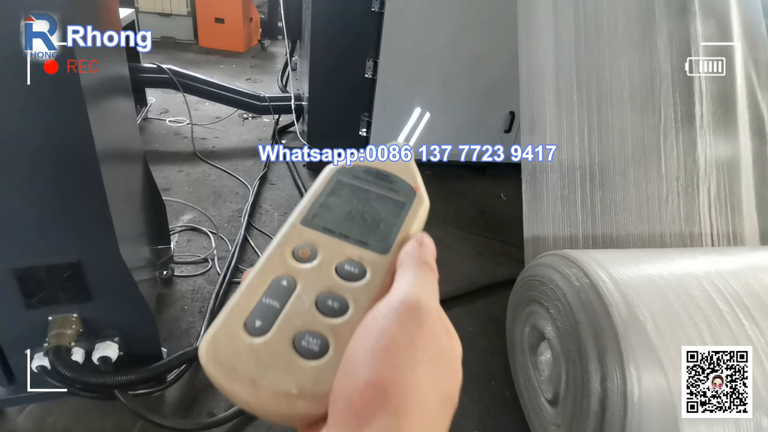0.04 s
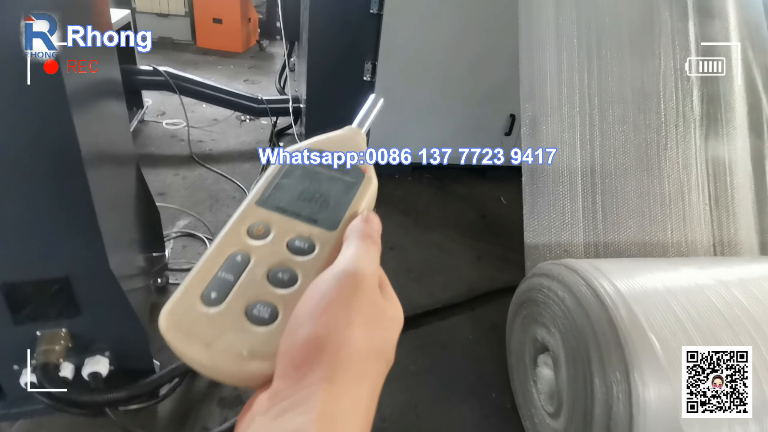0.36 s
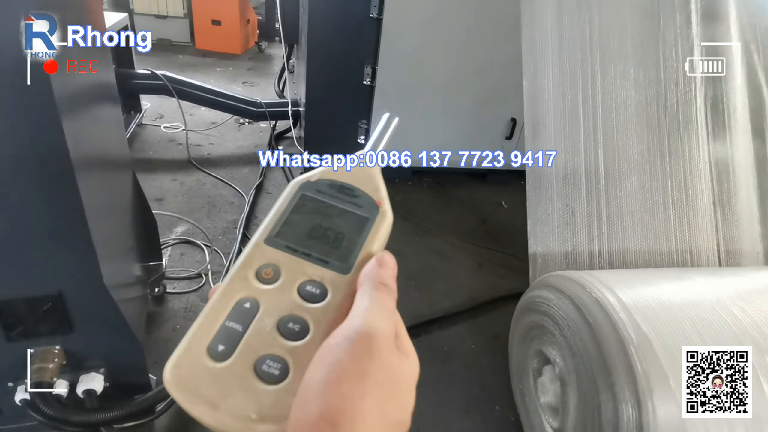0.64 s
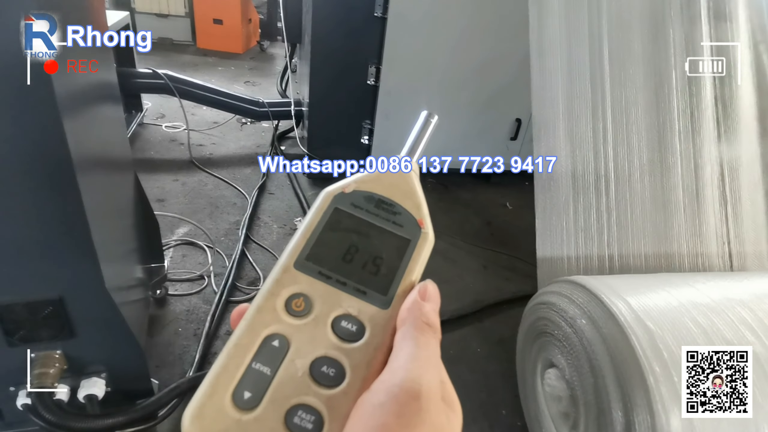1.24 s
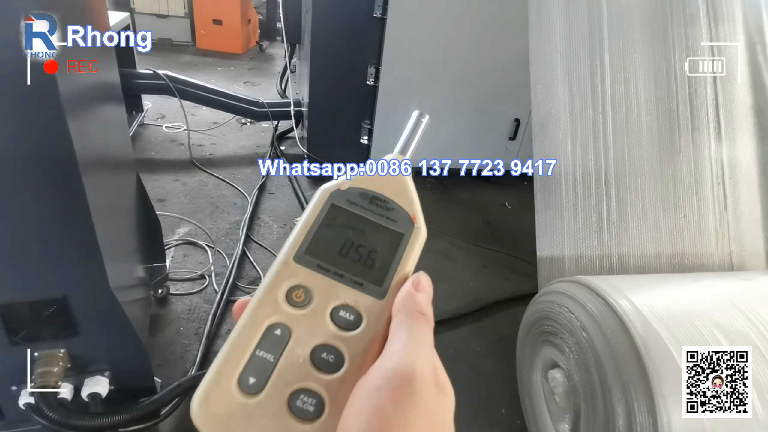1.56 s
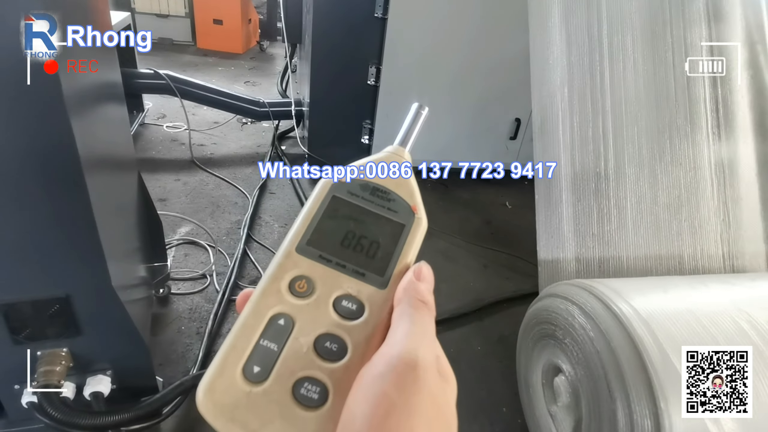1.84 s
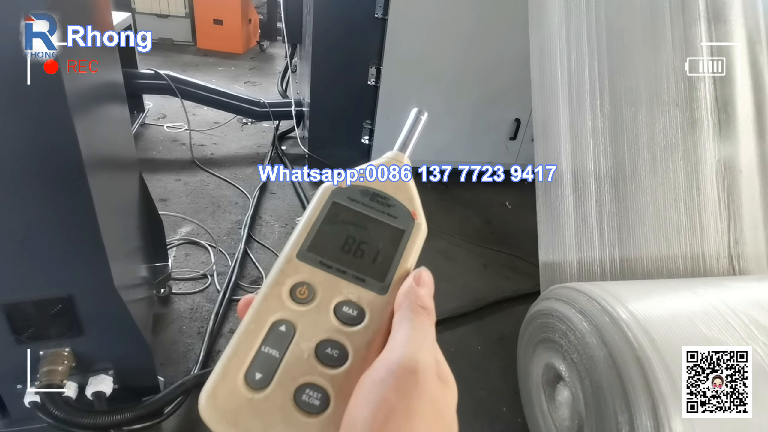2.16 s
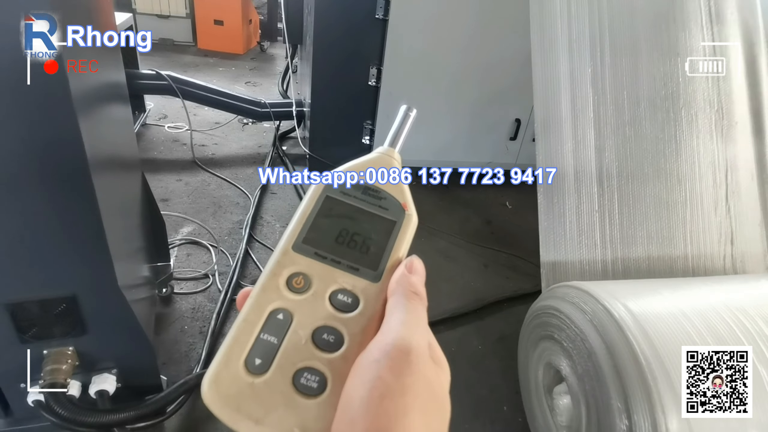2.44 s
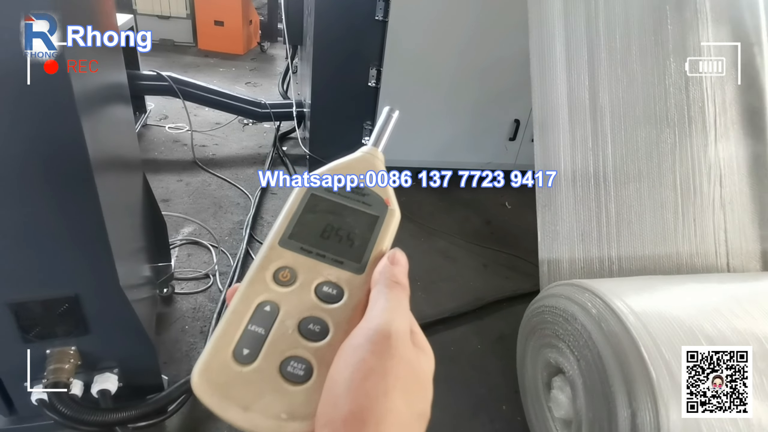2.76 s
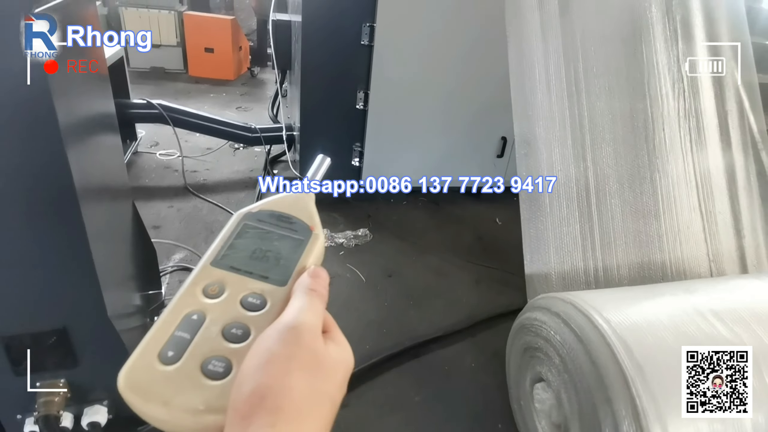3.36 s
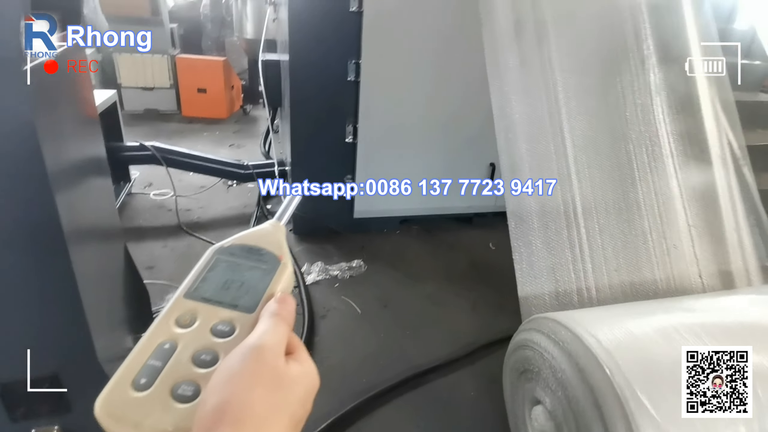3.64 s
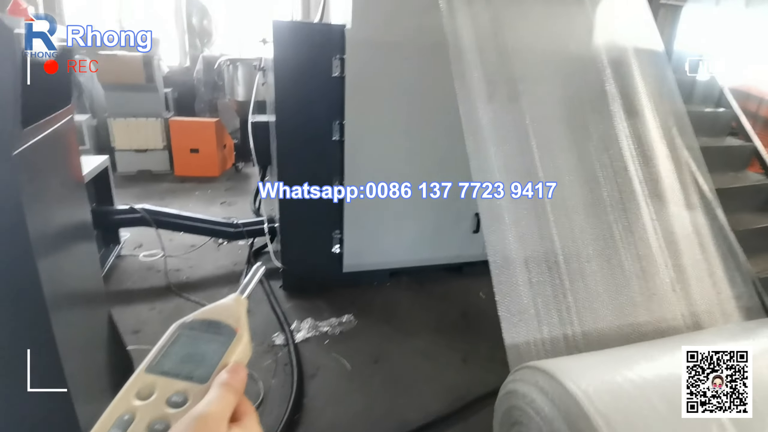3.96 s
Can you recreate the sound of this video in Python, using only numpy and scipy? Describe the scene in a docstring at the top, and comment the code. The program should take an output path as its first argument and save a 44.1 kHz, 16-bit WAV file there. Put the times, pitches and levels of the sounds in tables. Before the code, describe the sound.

A plastic grinding machine runs close by in a workshop for four seconds, with a swelling motor hum, steady whirr and faint hiss on the right. From 0.2 seconds it booms and rumbles in surges about twice a second, with plastic grinding just after. Lumps thud against the panels and plastic squeaks faintly on steel throughout. Near 2.5 and 2.7 seconds a panel gives two short, low growls.

```python
"""A plastic granulator runs in a workshop, heard from close by.
From the start a motor hums in swells over a steady whirr and a hiss from the right. At 0.2 s, and then
about twice a second, the rotor takes a load: knife strokes force the housing to boom on multiples of
the cutting rate, and a little later the plastic grinds. Along the way lumps thud against the panels and
plastic squeaks on steel. Near 2.5 s and 2.7 s the tumbling load draws two short growls from a panel."""
import sys
import numpy as np
from scipy.fft import rfft, irfft, next_fast_len
from scipy.io import wavfile
from scipy.ndimage import map_coordinates

SR = 44100
rng = np.random.default_rng(int(sys.argv[2]) if len(sys.argv) > 2 else 0)


def wav_out(sig):
    """Save sig, one row per channel (or a flat mono array), as 16-bit PCM at SR to the path in sys.argv[1]."""
    wavfile.write(sys.argv[1], SR, np.round(np.clip(np.atleast_2d(sig).T, -1, 1) * 32767).astype(np.int16))


N = 176400
TIME_S = np.arange(N) / SR
OPPOSED = np.array([[1], [-1]])  # plus on the left, minus on the right


# Load on the rotor: time_s, load_db
ROTOR_LOAD = [(0.0, -29), (0.17, -28), (0.2, -13), (0.26, -10.5), (0.46, -18), (0.49, -42), (0.75, -37),
              (0.85, -12.5), (0.99, -15.5), (1.06, -11), (1.22, -26.5), (1.3, -28.5), (1.4, -11),
              (1.47, -17.5), (1.49, -10.5), (1.68, -24), (1.83, -31.5), (1.96, -10.5), (2.07, -12.5),
              (2.1, -18), (2.16, -15.5), (2.26, -29), (2.39, -28), (2.44, -18), (2.56, -20), (2.67, -29),
              (2.73, -21.5), (2.81, -28), (2.97, -13), (3.07, -15), (3.13, -30), (3.17, -26), (3.2, -37),
              (3.36, -28), (3.41, -13.5), (3.46, -10.5), (3.6, -12.5), (3.77, -30.5), (3.87, -28),
              (4.0, -14.5)]
# Harmonics of the cutting rate in the housing: harmonic_number, relative_level_db
HOUSING_HARMONICS = [(2, -25), (3, -18), (4, -4), (5, 1), (6, -23.5), (7, -10), (8, -19.5), (9, -19),
                     (10, -35.5), (11, -34), (12, -30.5), (14, -28), (16, -30.5), (17, -27.5)]
# Spectrum of the rumble: frequency_hz, density_db
RUMBLE_SPECTRUM = [(25, -28), (45, -14.5), (70, -6.5), (110, -1), (170, 1), (230, -1.5), (300, -5),
                   (400, -16.5), (520, -25.5), (1200, -78)]
# Likeness of left and right in rumble, grinding and whirr: frequency_hz, correlation
COHERENCE = [(30, -0.9), (90, 0.43), (180, 0.8), (250, 0.4), (300, .6), (420, .35), (640, 0.64),
             (900, 0.24), (1300, 0.19), (2200, 0.3), (4000, 0.22)]

def housing(cut_phase, waver_db=1.4, jitter_rad=0.44, spread_rad=0.19, full_load_db=-13.5):
    """Forced vibration: periodic knife strokes make the housing boom and rumble, more under load."""
    load_db = curve(ROTOR_LOAD) - full_load_db
    tones = np.zeros((2, N))
    for harmonic, level_db in HOUSING_HARMONICS:
        phase = harmonic * cut_phase + rng.uniform(0, 2 * np.pi) + jitter_rad * wobble(12)
        stereo_phase = spread_rad * OPPOSED * wobble(2.85)
        tones += amp(level_db + waver_db * wobble(12)) * np.sin(phase + stereo_phase)
    boom = unit(tones) * amp(-14 + 1.23 * load_db)  # grows faster with load than the rumble
    rumble = stereo_noise(RUMBLE_SPECTRUM, COHERENCE, balance=[(60, 2.3), (130, -0.5), (300, -0.0024)])
    return boom + rumble * amp(-19.5 + 0.72 * load_db)


def rotor(cut_hz=38.25, drift=0.004):
    """Phase as the integral of frequency: 2 pi radians per knife stroke, at a slightly wandering speed."""
    return 2 * np.pi * np.cumsum(cut_hz * (1 + drift * wobble(3.956))) / SR


# Strength of the crushing: time_s, strength_db
CRUSHING = [(0.0, -33.5), (0.12, -41), (0.33, -27), (0.6, -40), (0.79, -40.5), (1.07, -26.5), (1.24, -37.5),
            (1.38, -33.5), (1.39, -30.5), (1.41, -36.5), (1.51, -27.5), (1.7, -36), (1.85, -39), (2.0, -32),
            (2.02, -27.5), (2.17, -34.5), (2.86, -37), (3.02, -29), (3.25, -41.5), (3.51, -31.5),
            (3.58, -27.5), (3.64, -31.5), (3.88, -43), (4.0, -29.5)]
# Spectrum of the crushed plastic: frequency_hz, density_db
GRIND_SPECTRUM = [(200, -13), (400, -1), (650, 3.5), (830, -5), (1080, 2), (1700, -9.5), (2300, -10),
                  (3000, -16), (4200, -28), (8000, -58)]
# Its stereo balance: frequency_hz, left_minus_right_db
GRIND_BALANCE = [(400, 3), (700, -1), (1200, -2), (2200, -9.5), (3500, -2.5)]

def grinding(cut_phase, stroke_depth=0.14, grain_db=2.16, full_crush_db=-28.5):
    """Amplitude-modulated noise: plastic is crushed in uneven bursts, one for each knife stroke."""
    bursts = (1 + stroke_depth * np.cos(cut_phase)) * amp(grain_db * wobble(170))
    level_db = -26.5 + 1.31 * (curve(CRUSHING) - full_crush_db)
    return amp(level_db) * unit(bursts * stereo_noise(GRIND_SPECTRUM, COHERENCE, GRIND_BALANCE))


# Lumps tumbling in the housing: peak_s, pitch_hz, level_db, left_minus_right_db
LUMP_IMPACTS = [(.285, 348.4, -24.5, 3), (.45, 229, -15, -15), (0.884, 297, -22, 7), (1.389, 522, -37, 8),
                (1.565, 520, -27, 5), (1.63, 366.6, -28, 7), (1.785, 373.4, -30, 10), (1.87, 409, -28, -11),
                (2.015, 491, -26, 0), (2.02, 670, -28.5, 3), (2.691, 399, -30.5, 0), (2.865, 404, -28, -14),
                (3.065, 358.6, -21, 6), (3.565, 557, -25, 0)]

def thuds(rise_s=0.011, width_hz=110):
    """Damped vibration after impact: each lump sets a panel rattling briefly, with a soft start."""
    out = np.zeros((2, N))
    for peak_s, pitch_hz, level_db, balance_db in LUMP_IMPACTS:
        age = np.maximum(TIME_S - peak_s + rise_s, 0) / rise_s  # in rise times
        envelope = age * np.exp(1 - age)
        tone = np.sin(2 * np.pi * pitch_hz * (TIME_S - peak_s))
        out += amp(level_db) * pan(balance_db) * envelope * unit(tone + rattling(pitch_hz, width_hz))
    return out


# Plastic rubbing on steel: peak_s, half_length_s, pitch_hz, width_hz, level_db
SCRAPES = [(0.398, 0.025, 2275, 16, -32), (0.334, 0.1, 2350, 123, -41), (1.023, .09, 2660, 233, -41.5),
           (2.097, 0.074, 2920, 330, -43), (2.524, 0.12, 2045, 200, -40.5), (3.064, .06, 2190, 193, -37.5),
           (3.573, 0.039, 2350, 109.7, -46.5), (3.97, .025, 2165, 400, -39)]

def squeaks(balance_db=-17):
    """Friction-excited resonance: plastic scrapes the steel in rough, narrow-band squeaks."""
    return pan(balance_db) * sum(amp(level_db) * swell(peak_s, half_s) * ringing(pitch_hz, width_hz)
                                 for peak_s, half_s, pitch_hz, width_hz, level_db in SCRAPES)


# The load tumbling without a full surge: peak_s, half_length_s, level_db
TUMBLES = [(2.517, 0.064, -23), (2.726, 0.017, -24)]

def growls(pitch_hz=246.7, width_hz=60):
    """Random excitation: the tumbling load makes a broad panel resonance swell and fade."""
    envelope = sum(amp(level_db) * swell(peak_s, half_s) for peak_s, half_s, level_db in TUMBLES)
    return envelope * rattling(pitch_hz, width_hz)


# Swells of the motor hum: time_s, relative_level_db
HUM_SWELLS = [(0.0, -33.5), (0.07, -18), (0.39, -32.5), (0.43, -17), (0.58, -34), (0.92, -19), (0.99, -33),
              (1.16, -19.5), (1.27, -39), (1.44, -19.5), (1.85, -33.5), (1.93, -21.5), (2.45, -31),
              (2.52, -18.5), (2.65, -39), (2.82, -17.5), (2.94, -41), (3.01, -17.5), (3.23, -32),
              (3.62, -30), (3.65, -32), (4.0, -30.5)]
# Thin whines: pitch_hz, level_db
WHINE_TONES = [(537, -53), (1044, -54.5), (2289, -55.5), (5985, -64.5)]
# Stereo balance of the drives, both whines and whirr: frequency_hz, left_minus_right_db
DRIVE_BALANCE = [(50, 16), (130, -.5), (330, -2), (700, 1.5), (1200, -1.5), (2100, -9), (3200, -4),
                 (5000, -4)]

def motor(hum_hz=99.55, jitter_rad=0.58, whine_jitter_rad=0.83, spread_rad=0.32, waver_db=1.1, sway_db=2):
    """Amplitude and phase modulation: the motor hum swells and wavers under a few unsteady whines."""
    stereo_phase = spread_rad * OPPOSED * wobble(7.8)
    hum_db = curve(HUM_SWELLS) - 0.5 + waver_db * wobble(25.04)
    hum = amp(hum_db) * np.sin(2 * np.pi * hum_hz * TIME_S + jitter_rad * wobble(14) + stereo_phase)
    whines = np.zeros((2, N))
    for pitch_hz, level_db in WHINE_TONES:
        phase = 2 * np.pi * pitch_hz * TIME_S + whine_jitter_rad * wobble(25)
        whines += amp(level_db) * pan(along(DRIVE_BALANCE, pitch_hz)) * np.sin(phase)
    return np.sqrt(2) * (hum * pan(sway_db * wobble(4.95)) + whines)  # sine peak is sqrt(2) times rms


# Spectrum of the whirring drives: frequency_hz, density_db
WHIRR_SPECTRUM = [(25, -15), (55, -14), (95, -1), (180, -1.5), (280, -7.5), (380, -10.5), (490, -15),
                  (640, -18), (820, -14.5), (1100, -15.5), (1650, -17), (2100, -15.5), (2600, -21.5),
                  (3400, -28), (4000, -30.5), (4800, -38), (8000, -54)]

def whirr(level_db=-29.5, waver_db=0.66):
    """Broadband machine noise: the drives whirr at a nearly steady level."""
    return amp(level_db + waver_db * wobble(10)) * stereo_noise(WHIRR_SPECTRUM, COHERENCE, DRIVE_BALANCE)


# Spectrum of the hiss: frequency_hz, density_db
HISS_SPECTRUM = [(2500, -34), (4000, 1), (4800, -3.5), (5900, 1), (6300, 0), (6900, 3), (7500, 0),
                 (7700, -20), (10000, -50)]

def hiss(cut_phase, level_db=-46, depth=0.077, drift_db=0.68):
    """Periodic modulation: a hiss on the right flutters with each rotor turn of two knife strokes."""
    flutter = 1 + depth * sum(np.cos(k * cut_phase / 2) for k in range(1, 4))
    gain = amp(level_db + drift_db * wobble(9)) * flutter
    return gain * stereo_noise(HISS_SPECTRUM, coherence=[(5000, 0.22)], balance=[(3500, -16), (7000, -25)])


# Spectrum of the high fizz: frequency_hz, density_db
FIZZ_SPECTRUM = [(3000, -10), (5000, -5), (7000, -5), (7700, 3), (8800, -2), (10000, 1), (10800, -1.5),
                 (11600, 3), (13500, 0), (14700, 3), (15800, -1.5)]

def fizz(level_db=-49, grain_db=1.1, drift_db=0.68):
    """Random modulation: fast level flicker gives faint treble noise a fine grain."""
    gain = amp(level_db + drift_db * wobble(18))
    grain = amp(grain_db * wobble(600))
    noise = stereo_noise(FIZZ_SPECTRUM, coherence=[(7000, 0.1), (7800, 0.87)], balance=[(8000, 0.6)])
    return gain * unit(grain * noise)


def rattling(pitch_hz, width_hz):
    """Partial coherence: a shaken panel rings partly alike on the left and right."""
    shared, left, right = [ringing(pitch_hz, width_hz) for _ in range(3)]
    return unit(shared + np.array([left, right]) / np.sqrt(2))


def ringing(pitch_hz, width_hz):
    """Narrow-band noise of rms 1: a resonance kept ringing by many small blows."""
    envelope = wobble(2 * width_hz) + 1j * wobble(2 * width_hz)
    return unit(np.real(envelope * np.exp(2j * np.pi * pitch_hz * TIME_S)))


def stereo_noise(spectrum, coherence, balance):
    """Mid-side mixing: coloured noise of rms 1 with a given left-right correlation and balance."""
    def mid_side_gains(hz):
        angle = np.arccos(np.clip(along(coherence, hz), -1, 1)) / 2
        return amp(along(spectrum, hz)) * [np.cos(angle), np.sin(angle)]
    mid, side = filtered(rng.standard_normal((2, N)), mid_side_gains)
    return unit(filtered(np.array([mid + side, mid - side]), lambda hz: pan(along(balance, hz))))


def left_first(x, lead_s=0.000453):
    """Arrival-time difference: left leads by a share of lead_s, nearly all of it in the upper range."""
    share = [(650, 0.036), (1300, 0.97)]
    return filtered(x, lambda hz: np.exp(1j * np.pi * hz * lead_s * along(share, hz) * OPPOSED))


def filtered(x, response):
    """Linear filtering: the spectrum of x times a frequency response."""
    size = next_fast_len(N + SR // 2)
    return irfft(rfft(x, size) * response(np.fft.rfftfreq(size, 1 / SR)), size)[..., :N]


def pan(balance_db):
    """Constant-power panning: left and right gains for a level difference."""
    gains = amp(OPPOSED * balance_db / 2)
    return gains / np.sqrt(np.mean(gains ** 2, axis=0))


def wobble(rate_hz):
    """Low-pass noise: a spline through rate_hz random knots a second."""
    return map_coordinates(rng.standard_normal(1024), [TIME_S * rate_hz + 2], mode="mirror")


def swell(peak_s, half_s):
    """Gaussian envelope with standard deviation half_s."""
    return np.exp(-((TIME_S - peak_s) / half_s) ** 2 / 2)


def curve(points):
    """Linear interpolation of (time_s, value) points at every sample."""
    return np.interp(TIME_S, *np.transpose(points))


def along(points, hz):
    """Interpolation of (frequency_hz, value) points on a logarithmic axis."""
    frequencies, values = np.transpose(points)
    return np.interp(np.log(hz + 1), np.log(frequencies + 1), values)


def amp(db):
    """Amplitude ratio from decibels."""
    return 10 ** (np.asarray(db) / 20)


def unit(x):
    """Normalisation to rms 1."""
    return x / np.sqrt(np.mean(x ** 2) + 1e-20)


def scene():
    """Superposition: the granulator and its background, with one rotor timing boom, grind and hiss."""
    cut_phase = rotor()
    machine = housing(cut_phase) + growls() + left_first(grinding(cut_phase) + squeaks()) + thuds()
    return machine + motor() + left_first(whirr() + hiss(cut_phase)) + fizz()


def record(dry, cutoff_hz=15750):
    """Band limiting: an ideal low-pass filter passes nothing above the cutoff."""
    return filtered(dry, lambda hz: hz < cutoff_hz)


dry = scene()
out = record(dry)
wav_out(out)
```